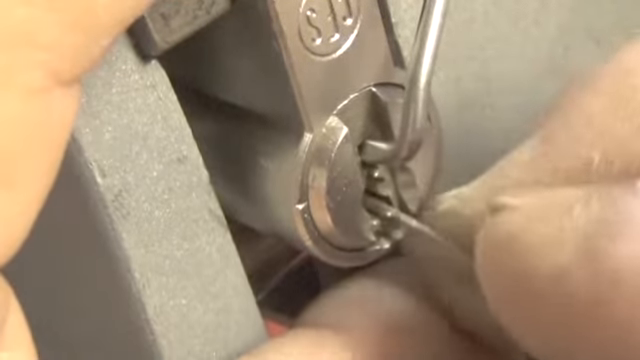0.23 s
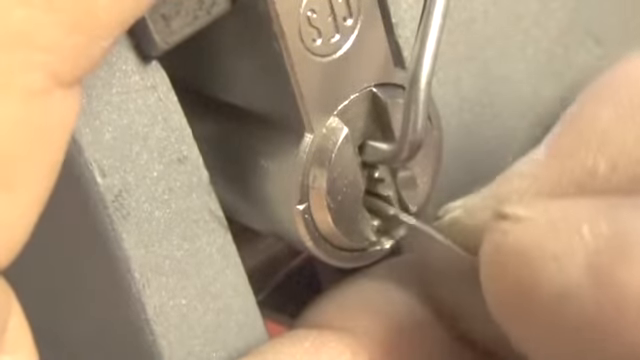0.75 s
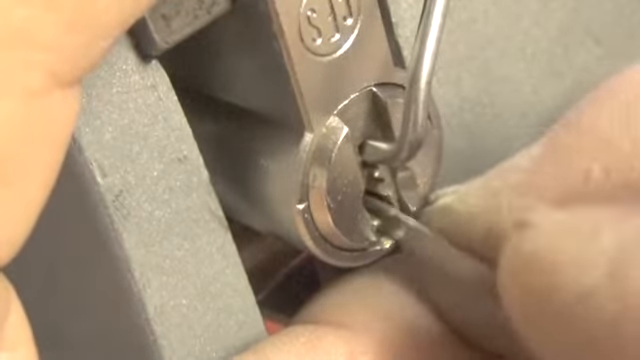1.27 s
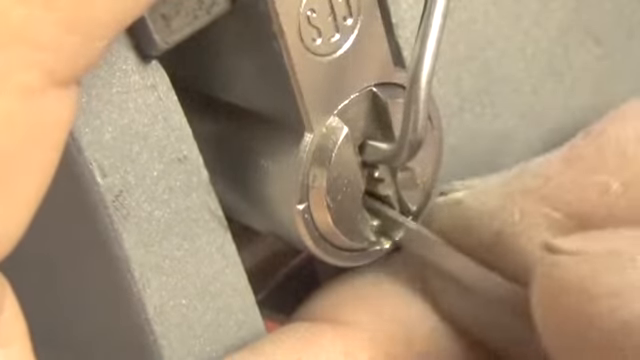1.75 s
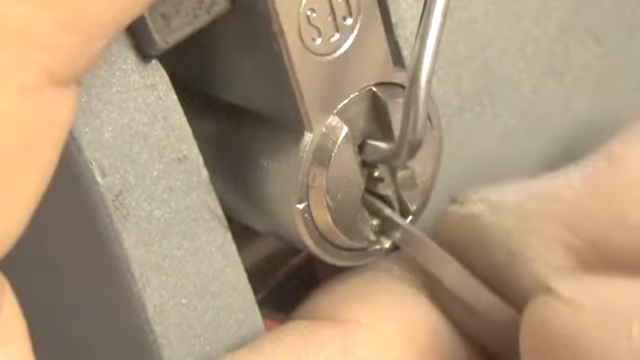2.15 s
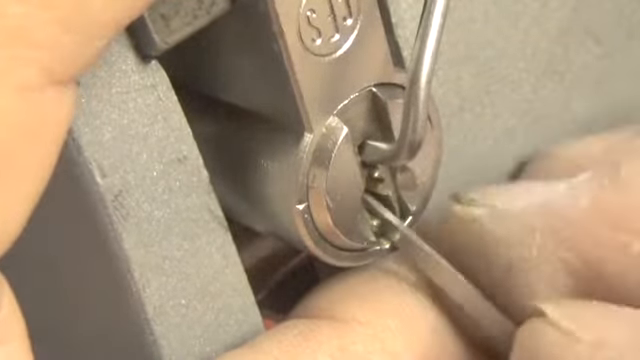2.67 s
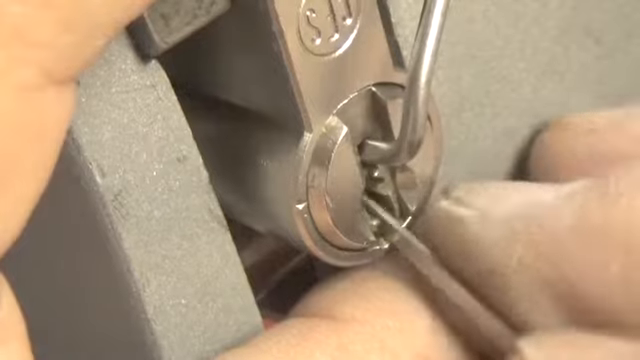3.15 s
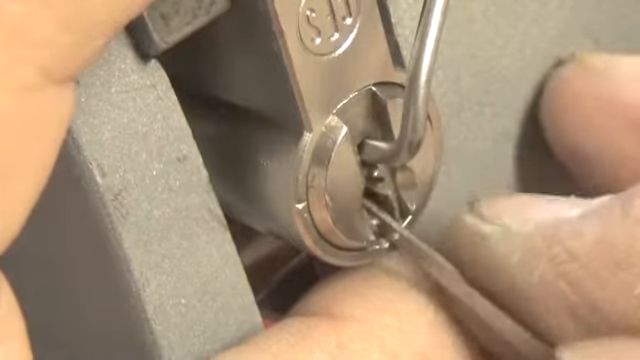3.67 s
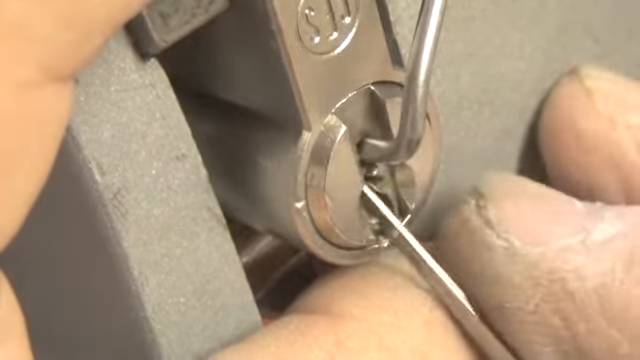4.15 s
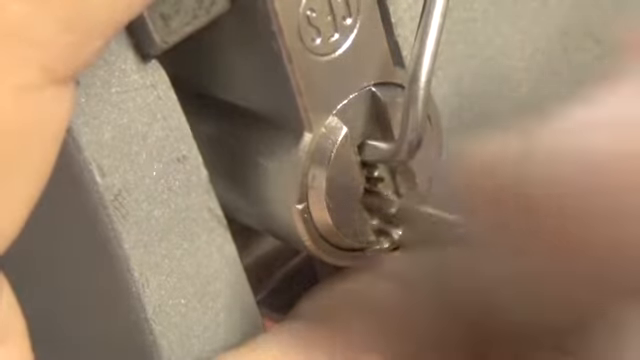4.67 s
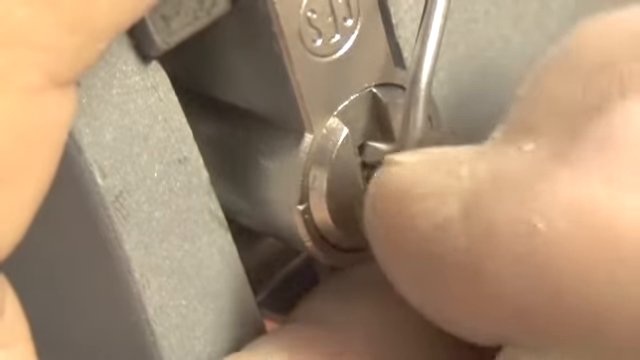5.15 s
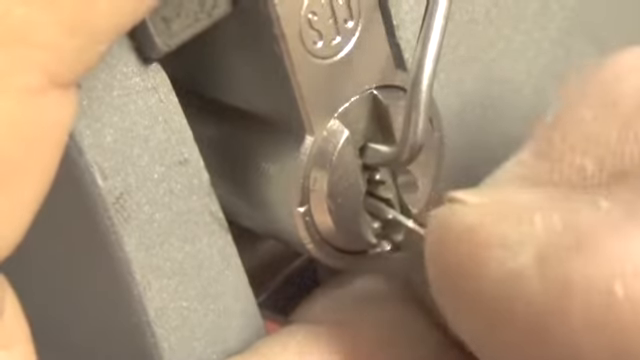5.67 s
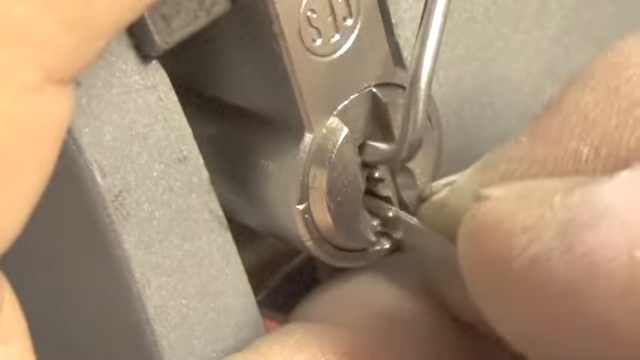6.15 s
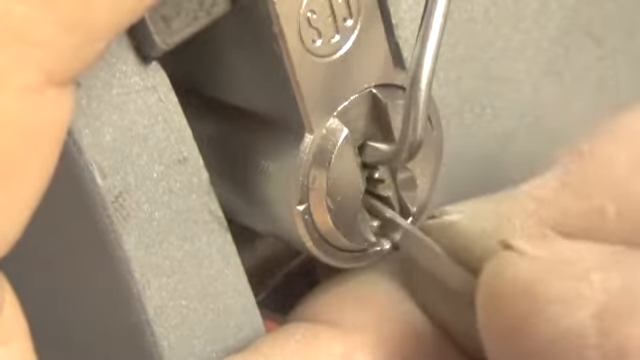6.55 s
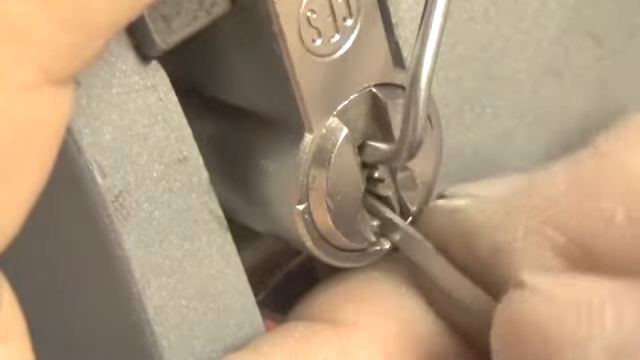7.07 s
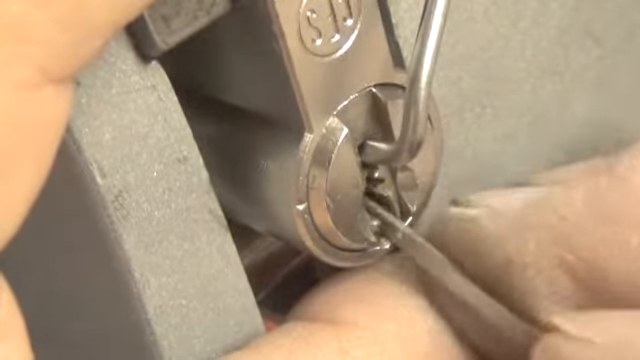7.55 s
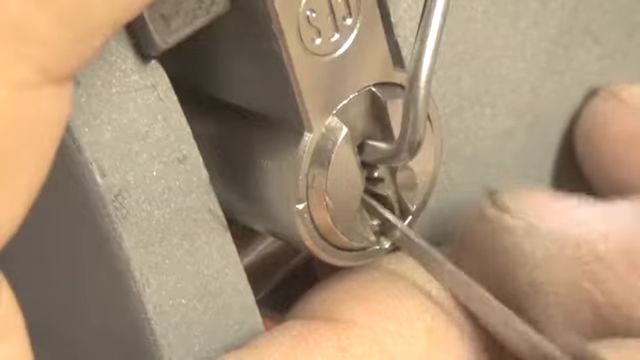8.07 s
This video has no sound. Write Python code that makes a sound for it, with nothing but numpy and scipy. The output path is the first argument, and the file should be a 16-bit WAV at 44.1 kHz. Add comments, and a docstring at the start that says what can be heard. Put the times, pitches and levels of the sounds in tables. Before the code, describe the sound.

Close-miked lock picking indoors: crisp, dry ticks of thin steel slipping off pins, with a small clacking ring from the lock plug and case. Short, soft scrapes separate the snaps. Some pushes carry into the door as dull low knocks, strongest about two seconds in. Steady faint rumble and hiss, short room echo, sound nearly centred.

```python
"""A light scrape and two quick metal snaps come first: a steel pick works the pins of a door lock.
It is close by in a small quiet room. Each snap is a burst of noise that rings the pick, plug and lock case.
Scrapes are noise grains ringing in the keyway, with faint stray ticks around them.
Harder pushes ring the door in low thuds. Soft room noise and a short echo surround it all."""
import sys
import numpy as np
from scipy import signal
from scipy.fft import rfft, irfft, next_fast_len
from scipy.io import wavfile

SR = 44100
rng = np.random.default_rng(int(sys.argv[2]) if len(sys.argv) > 2 else 0)


def wav_out(sig):
    """Save sig, one row per channel (or a flat mono array), as 16-bit PCM at SR to the path in sys.argv[1]."""
    wavfile.write(sys.argv[1], SR, np.round(np.clip(np.atleast_2d(sig).T, -1, 1) * 32767).astype(np.int16))


N = 366455

CONTACT_SPREAD_DB = 2.0  # typical random change of each resonance from one contact to the next
RING_SIZE, LEAD_SIZE = SR // 8, SR // 250  # samples in one contact, and in its creep before the crack


def from_db(db):
    """Turn decibels into a gain."""
    return 10 ** (np.asarray(db) / 20)


def rms_one(x):
    """Scale a sound to an rms of 1."""
    return x / np.sqrt(np.mean(x ** 2) + 1e-20)


def at_hz(points, hz):
    """Read a table between its points, along a log-frequency axis."""
    freqs, values = np.transpose(points)
    return np.interp(np.log(np.maximum(hz, 1)), np.log(freqs), values)


def colour(x, spectrum):
    """Make some pitches stronger than others, then scale to an rms of 1."""
    size = next_fast_len(x.shape[-1])
    hz = np.arange(size // 2 + 1) * SR / size
    shaped = rfft(x, size) * from_db(at_hz(spectrum, hz))
    return rms_one(irfft(shaped, size)[..., :x.shape[-1]])


def band(x, low_hz, high_hz):
    """Keep the pitches between two limits, with a filter that never looks ahead."""
    sos = signal.butter(2, [low_hz, high_hz], "band", fs=SR, output="sos")
    return signal.sosfilt(sos, x)


def add(track, start_s, sound):
    """Mix a sound into the track at a given time."""
    start = int(np.clip(round(start_s * SR), 0, N - 1))
    track[start:start + len(sound)] += sound[:N - start]


def at_level(sound, db):
    """Give a short sound the energy of 10 ms at this rms level."""
    energy = np.sum(sound ** 2) + 1e-20
    return sound * from_db(db) * np.sqrt(SR / 100 / energy)


def body(force, modes, spread_db):
    """A struck object rings at several pitches side by side; each contact favours other ones."""
    out = 0
    for pitch_hz, width_hz, level_db in modes:
        # a wider resonance dies away sooner
        r = np.exp(-np.pi * width_hz / SR)
        gain = (1 - r * r) / 2
        feedback = [1, -2 * r * np.cos(2 * np.pi * pitch_hz / SR), r * r]
        ring = signal.lfilter([gain, 0, -gain], feedback, force + 1e-18)
        sign = rng.choice([-1, 1])
        out = out + sign * from_db(level_db + spread_db * rng.standard_normal()) * ring
    return out


def contact(chatter_db, chatter_t60, creep_db, creep_t60):
    """The tip creeps with a swelling rasp, lets go in one crack, then buzzes in tiny dying rebounds."""
    # each t60 is the time in seconds for a 60 dB rise or fall
    t = (np.arange(RING_SIZE) - LEAD_SIZE) / SR
    creep = (t < 0) * from_db(-60 * np.abs(t) / creep_t60)
    chatter = (t >= 0) * from_db(-60 * np.abs(t) / chatter_t60)
    swell = from_db(creep_db) * creep / np.linalg.norm(creep)
    swell += from_db(chatter_db) * chatter / np.linalg.norm(chatter)
    # the crack is a handful of hard contacts within about a millisecond
    crack = (t > 0) * from_db(-60 * np.abs(t) / 0.0029) * rng.standard_normal(RING_SIZE)
    first_touch = (t == 0) / 2
    return first_touch + crack / np.linalg.norm(crack) + swell * rng.standard_normal(RING_SIZE)


# colour of the room noise: pitch_hz, relative level_db (per Hz)
AIR_SPECTRUM = [(15, -55), (25, -28.5), (123, -2.5), (223, -3.5), (285, 0.5), (363, 0.5), (545, 0),
                (988, 0.5), (1610, -3), (2410, -3), (3520, -5.5), (4140, -7), (8830, -11.5), (14800, -16),
                (16000, -26)]
# how alike left and right are in the room noise: pitch_hz, correlation (1 = the same)
AIR_LIKENESS = [(30, 1), (80, 1), (300, .9), (900, 0.09), (3000, 0.38), (9000, 0.99)]
AIR_DB = -63.5  # rms level of the room noise


def air():
    """Steady room rumble and microphone hiss: coloured noise, partly shared between left and right."""
    hz = np.arange(N // 2 + 1) * SR / N
    alike = np.clip(at_hz(AIR_LIKENESS, hz), 0, 1)
    mid, side = rfft(rng.standard_normal((2, N)))
    both_sides = np.sqrt(1 + alike) * mid + np.sqrt(1 - alike) * side * [[1], [-1]]
    return from_db(AIR_DB) * colour(irfft(both_sides, N), AIR_SPECTRUM)


# room echo against the direct sound: pitch_hz, level_db
ECHO_LEVEL = [(150, -3), (400, -1.5), (1000, -3.5), (2000, -11), (4500, -15.5), (9000, -18.5), (15000, -26)]
# how long the room takes to fade by 60 dB: pitch_hz, fade_s
ECHO_FADE = [(150, 0.44), (1000, 0.25), (5000, 0.3), (9000, .39), (15000, 0.27)]


def room(x, side_db, build_s):
    """Dense reflections build up after the direct sound and die away at each pitch's own pace."""
    t = np.arange(SR // 2) / SR
    edges = np.geomspace(80, 17000, num=13)
    echo = np.zeros((2, len(t)))
    build_up = 1 - np.exp(-(t / build_s) ** 2)
    for low, high in zip(edges, edges[1:]):
        hz = np.sqrt(low * high)
        mid, side = band(rng.standard_normal((2, len(t))), low, high)
        reflections = mid + from_db(side_db) * side * [[1], [-1]]
        fade = from_db(-60 * t / at_hz(ECHO_FADE, hz))
        tail = rms_one(reflections * fade * build_up)
        # wider bands hold more energy
        echo += tail * from_db(at_hz(ECHO_LEVEL, hz)) * np.sqrt(2 * (high - low) / SR / len(t))
    return signal.fftconvolve(x[None], echo, axes=1)[:, :N]


def hand_echo(x, delay_s, db):
    """An early reflection, as off the hand beside the lock, is flipped on the right to add width."""
    t = np.arange(N) / SR
    return from_db(db) * np.interp(t - delay_s, t, x) * np.array([[1], [-1]])


GRAZE_SPREAD_S = 0.043  # typical random shift of a tick's time around a stroke


def stray_ticks(count, db, spread_db):
    """The tip grazes the wards of the keyway: short noise bursts ring keyway and pick around the strokes."""
    out = np.zeros(N)
    for stroke, part, size in rng.random((count, 3)):
        start_s, length_s = STROKES[int(stroke * len(STROKES))][:2]
        tick_s = abs(start_s + part * length_s + GRAZE_SPREAD_S * rng.standard_normal())
        fade = np.exp(-np.arange(RING_SIZE) / (SR / 1000))
        graze = rng.standard_normal(RING_SIZE) * fade
        tick = body(graze, KEYWAY_MODES + PICK_MODES, CONTACT_SPREAD_DB)
        add(out, tick_s, at_level(tick, db + spread_db * size))
    return out


# hard pushes that carry into the door: start_s (moment of the crack), level_db (rms over 10 ms)
KNOCKS = [(1.977, -55), (2.0864, -41.5), (2.1141, -45.5), (2.6472, -57.5), (3.2225, -54.5), (3.4799, -57.5),
          (4.0701, -58), (4.1187, -49), (6.2953, -53), (7.1175, -54.5), (7.5324, -57), (8.136, -60.5)]
# resonances of the door: pitch_hz, width_hz, level_db (before the random spread)
DOOR_MODES = [(118.7, 38, -4.5), (204, 47, -5.5), (296, 28.4, 6), (359.7, 110, 5), (460, 91, 1.5),
              (730, 90, 0.5), (816, 290, 6.5), (970, 100, -6)]


def knocks():
    """A hard push rings the heavy door's low resonances, which take a few milliseconds to answer."""
    out = np.zeros(N)
    for start_s, level_db in KNOCKS:
        force = contact(chatter_db=-4.5, chatter_t60=0.018, creep_db=-12.5, creep_t60=0.017)
        thud = band(body(force, DOOR_MODES, CONTACT_SPREAD_DB), 95, 1000)
        add(out, start_s - LEAD_SIZE / SR, at_level(thud, level_db))
    return out


def friction(length_s, per_s, spread_db, hiss_db, edge_s):
    """Steel catches and slips in uneven grains over a smooth hiss, as the pressure rises and falls."""
    t = np.arange(int((length_s + edge_s) * SR)) / SR
    slip_db = spread_db * np.minimum(rng.exponential(1, len(t)), 3)
    slips = (rng.random(len(t)) < per_s / SR) * from_db(slip_db)
    grains = rms_one(slips * rng.choice([-1, 1], len(t)))
    # a long stroke glides more smoothly than a quick jab, so it has more hiss
    glide = from_db(hiss_db) * np.sqrt(t[-1] / edge_s)
    hiss = glide * rng.standard_normal(len(t))
    pressure = np.sin(np.pi / 2 * np.clip(np.minimum(t, t[-1] - t) / edge_s, 0, 1))
    return (grains + hiss) * pressure


# strokes of the pick in the keyway: start_s, length_s (without the soft edges),
# scrape_db (rms before easing off), rub_db (low rub against the scrape)
STROKES = [(0, 0.53, -62, -4), (1.052, 0.022, -55.5, -8), (1.479, 0.026, -71, 8.5), (1.67, 0.069, -69.5, 0),
           (2.053, 0.038, -57.5, 3), (2.618, 0.064, -67.5, 1.5), (2.909, 0.075, -67, -6.5),
           (3.195, 0.044, -67.5, 0), (3.938, 0.056, -70, 6), (4.047, 0.056, -52.5, -4.5),
           (4.552, 0.012, -57.5, -18.5), (4.66, 0.12, -56, -10.5), (4.836, 0.059, -55, -10),
           (5.265, 0.063, -61.5, -10), (5.529, 0.016, -64, 3.5), (5.901, 0.042, -58, -10),
           (6.284, 0.05, -64.5, -1), (6.517, 0.032, -73, 8.5), (6.71, 0.068, -61, -8),
           (7.054, 0.069, -62.5, 0.5), (7.37, .125, -63, -3), (7.503, 0.034, -50.5, -12.5),
           (7.68, 0.065, -67, 0), (8.063, 0.14, -60, -9)]
# resonances of the keyway: pitch_hz, width_hz, level_db (before the random spread)
KEYWAY_MODES = [(2500, 470, 4.5), (4170, 560, 0.5), (4960, 240, 1.5), (5960, 830, -3), (6800, 1600, -2.5),
                (9040, 1500, 0), (10900, 1200, -25)]
# resonances of the case damped by the hand: pitch_hz, width_hz, level_db (before the random spread)
GRIP_MODES = [(316.3, 62, 7.5), (480, 220, -2.5), (853, 410, 3), (1236, 240, -1), (1940, 280, -2)]
SCRAPE_HZ = 2600  # ring of the blade while it drags
EASE_DB_PER_S = 3  # the hand eases off through a stroke


def scrapes(edge_s):
    """Fine grains ring in the keyway; coarser ones rub through the case, damped by the hand."""
    out = np.zeros(N)
    blade_modes = [(SCRAPE_HZ, 400, -5)] + KEYWAY_MODES
    for start_s, length_s, scrape_db, rub_db in STROKES:
        fine = friction(length_s, per_s=330, spread_db=6.0, hiss_db=-7.5, edge_s=edge_s)
        coarse = friction(length_s, per_s=160, spread_db=3.0, hiss_db=-3.0, edge_s=edge_s)
        rasp = band(body(fine, blade_modes, CONTACT_SPREAD_DB), 1800, 12500)
        rub = band(body(coarse, GRIP_MODES, CONTACT_SPREAD_DB), 140, 2800)
        easing_db = -EASE_DB_PER_S * np.arange(len(rasp)) / SR
        stroke = rms_one(rasp) + from_db(rub_db) * rms_one(rub)
        add(out, start_s - edge_s / 2, from_db(scrape_db + easing_db) * stroke)
    return out


# pin snaps: start_s (moment of the crack), level_db (rms over 10 ms, midway between pick and plug),
# weight_db (case against that level: low for a free flick, high for a dull push),
# tip_db (how far the tick of the pick stands above the clack of the plug)
SNAPS = [(.04, -46.5, -7, 1), (0.0546, -33, -6, 0.5), (0.1646, -55, -4, 1), (0.3714, -47, -7, 2),
         (.508, -49, 1.5, 1), (0.6605, -62, 1.5, 0), (.716, -57.5, 1.5, 7), (.8896, -65.5, 8, -15),
         (1.0717, -28.5, -12.5, 8.5), (1.3, -61.5, 0.5, -2), (1.32, -55, -8.5, -2), (1.395, -58, -6, -1),
         (1.944, -56, -7.5, 8), (1.978, -49, -7.5, 5.5), (2.0552, -48, 1, 8), (2.0867, -33.5, -2, 2),
         (2.1146, -38, -0.5, 0.5), (2.2427, -57.5, 0, 1), (2.2598, -54, 6.5, 4.5), (2.3731, -58.5, -6, 9.5),
         (2.53, -52.5, -1.5, 2.5), (2.6471, -68.5, 13, -13), (2.9241, -55.5, 0, -7),
         (2.9873, -46.5, -4.5, 6), (3.134, -52.5, -8.5, 3.5), (3.3122, -46, -9, -5.5), (3.4799, -54, 9, -1),
         (3.5322, -43.5, -8.5, 3), (3.755, -36, -9.5, 6), (3.9403, -60, 2.5, 1), (3.958, -55, 6, -1),
         (3.972, -56.5, -1, 4), (3.983, -60.5, 0, 4), (4.0423, -30.5, -15, 18.5), (4.0683, -32, -7.5, 10),
         (4.1184, -37.5, -4.5, -4.5), (4.67, -45, -12, 8.5), (4.679, -52, -11, 7), (4.722, -48, -15, 5),
         (4.7281, -44.5, -1, 7), (4.7589, -46, -3.5, 0), (4.874, -55, -2, 1), (5.3783, -75, 14, 0),
         (5.4535, -56, -6.5, -1), (5.546, -60, 5, -8), (5.5727, -63.5, -16.5, -7), (5.93, -53.5, -2.5, -8),
         (5.9883, -35, -9.5, -3.5), (6.2947, -63.5, -2.5, -11), (6.7925, -54, -1, -1), (6.951, -39, -17, 4),
         (6.9528, -27.5, -13.5, 5), (7.118, -69, 10, -14), (7.206, -63.5, -8, 14), (7.5128, -49, -15, 10),
         (7.533, -30, -9, 7.5), (7.929, -39, -7.5, 1), (8.071, -60, -7, -8), (8.1368, -27.5, -14, 7)]
# resonances of the pick: pitch_hz, width_hz, level_db (before the random spread)
PICK_MODES = [(7400, 2800, -5.5), (9200, 330, -4), (10500, 1800, -15.5), (11540, 1320, -11),
              (14880, 2000, -14)]
# resonances of the plug, the part that holds the keyway: pitch_hz, width_hz, level_db (same)
PLUG_MODES = [(4030, 430, -5), (4350, 164, -6), (4880, 200, 2), (5870, 830, -7), (7100, 1290, -7.5)]
# resonances of the lock case: pitch_hz, width_hz, level_db (same)
CASE_MODES = [(766, 138, -2.5), (1004, 150, -5.5), (1193, 133, 1.5), (1479, 193, -3.5), (2053, 110, 1.5),
              (2250, 210, -4), (2440, 310, -4.5), (3030, 620, -1.5)]
PICK_HZ, PICK_SPREAD_OCTAVES = 9250, 0.0278  # middle of the pick's main ring, and its random shift
PLUG_HZ, PLUG_OCTAVES_PER_DB = 4610, -.024  # plug's main ring at weight 0; it sinks with weight
PLUG_EDGE = 0.68  # the plug gives little below this share of its main ring
CHATTER_PER_WEIGHT = 0.34  # dB per dB: a weighty push buzzes on the pin, a flick cracks cleanly


def snaps():
    """A pin slips off the tip: the pick ticks, the plug clacks and the case rings lowest and longest."""
    out = np.zeros(N)
    for start_s, level_db, weight_db, tip_db in SNAPS:
        # the light pick settles sooner than the heavy plug
        buzz_db = CHATTER_PER_WEIGHT * weight_db
        on_pick = contact(chatter_db=2.5 + buzz_db, chatter_t60=0.019,
                          creep_db=-7.5 + buzz_db, creep_t60=0.0055)
        on_plug = contact(chatter_db=3.5 + buzz_db, chatter_t60=0.025,
                          creep_db=-5.5 + buzz_db, creep_t60=.016)
        # where the tip bears shifts the main ring of the pick
        pick_hz = PICK_HZ * 2 ** (PICK_SPREAD_OCTAVES * rng.standard_normal())
        plug_hz = PLUG_HZ * 2 ** (PLUG_OCTAVES_PER_DB * weight_db)
        pick = body(on_pick, [(pick_hz, 1600, 0)] + PICK_MODES, CONTACT_SPREAD_DB)
        plug = body(on_plug, [(plug_hz, 1200, 5)] + PLUG_MODES, CONTACT_SPREAD_DB)
        case = body(on_plug, CASE_MODES, CONTACT_SPREAD_DB)
        snap = at_level(band(pick, 7300, 13800), level_db + tip_db / 2)
        snap += at_level(band(plug, PLUG_EDGE * plug_hz, 8800), level_db - tip_db / 2)
        snap += at_level(band(case, 640, 4800), level_db + weight_db)
        add(out, start_s - LEAD_SIZE / SR, snap)
    return out


def scene():
    """The lock sits nearly straight ahead, a touch louder on the right, with the room around it."""
    ticks = stray_ticks(count=30, db=-66, spread_db=5.5)
    lock = snaps() + knocks() + scrapes(edge_s=.018) + ticks
    direct = lock * from_db([[-.15], [.15]])
    near = direct + hand_echo(lock, delay_s=.0004, db=-18.5)
    return near + room(lock, side_db=-11.0, build_s=0.002) + air()


CUTOFF_HZ = 16600


def record(dry):
    """A steep filter removes the very highest treble."""
    sos = signal.ellip(10, .1, 80, CUTOFF_HZ, fs=SR, output="sos")
    return signal.sosfilt(sos, dry)


dry = scene()
out = record(dry)
wav_out(out)
```